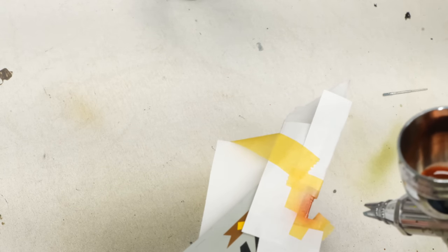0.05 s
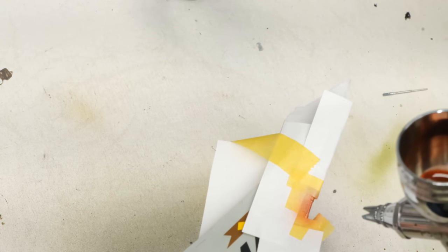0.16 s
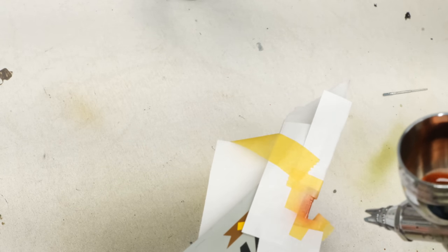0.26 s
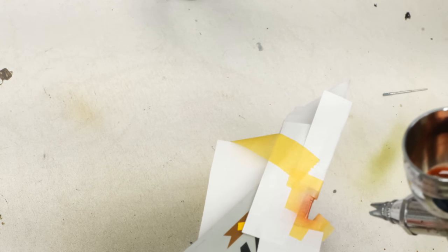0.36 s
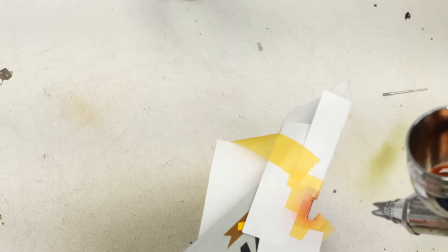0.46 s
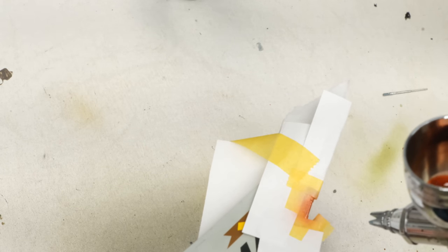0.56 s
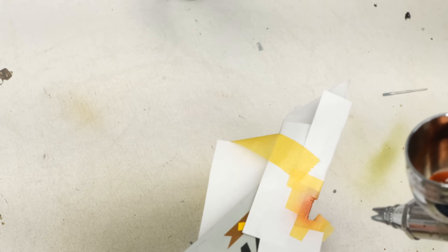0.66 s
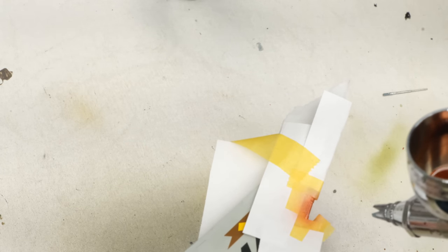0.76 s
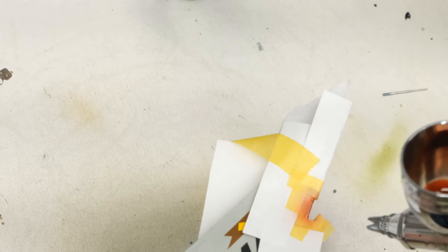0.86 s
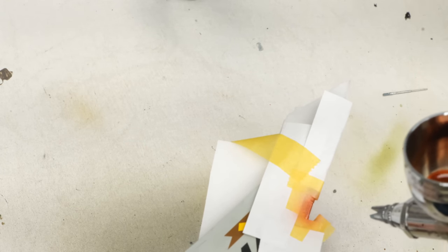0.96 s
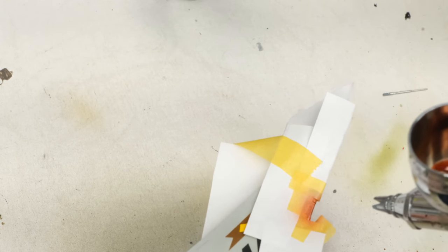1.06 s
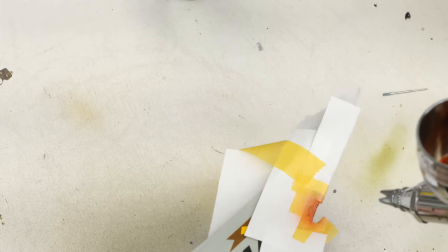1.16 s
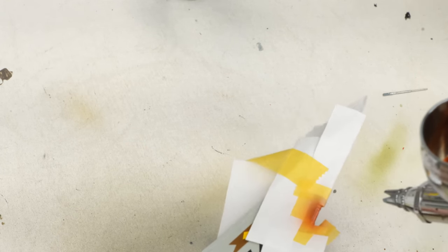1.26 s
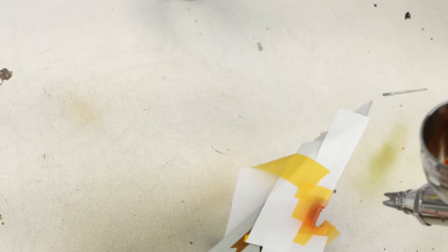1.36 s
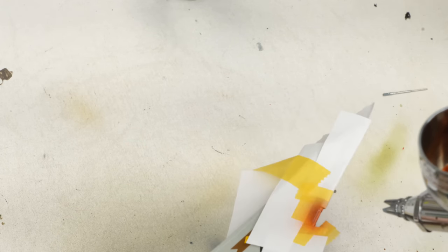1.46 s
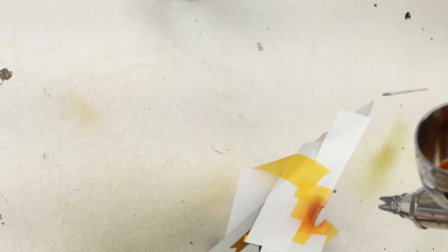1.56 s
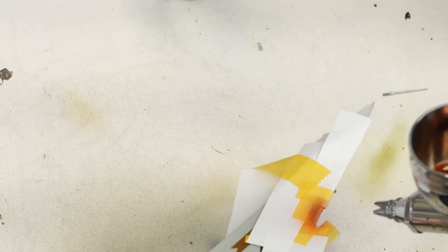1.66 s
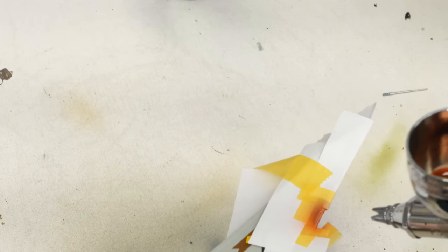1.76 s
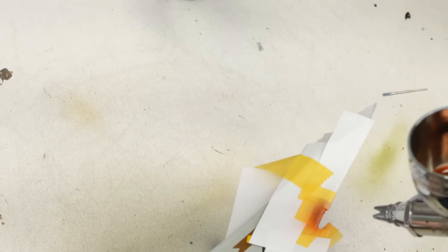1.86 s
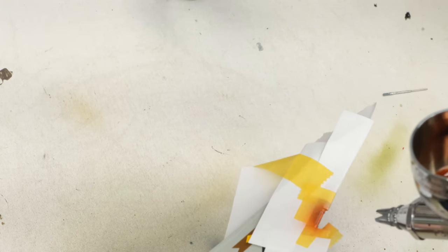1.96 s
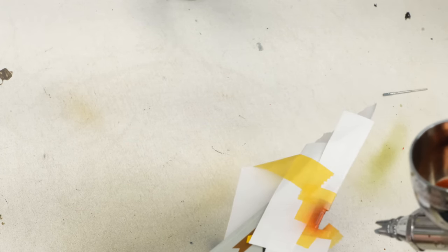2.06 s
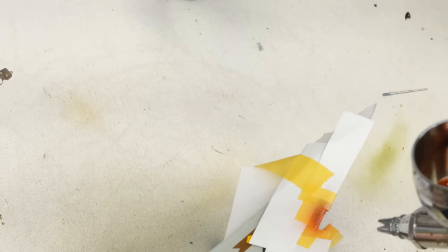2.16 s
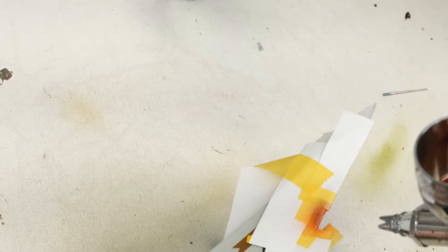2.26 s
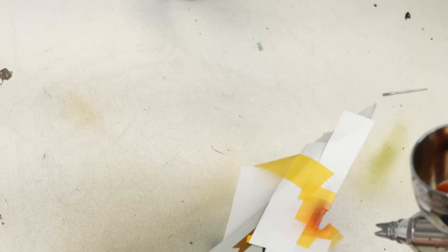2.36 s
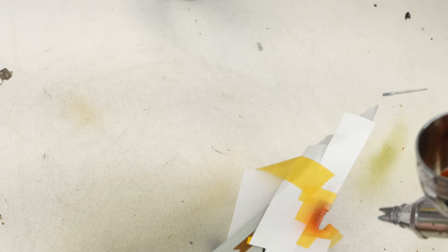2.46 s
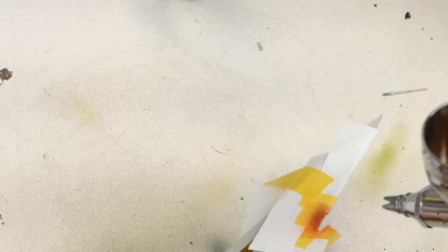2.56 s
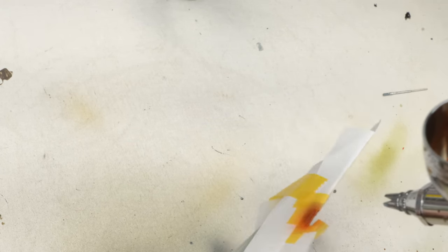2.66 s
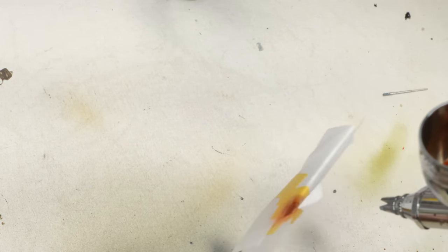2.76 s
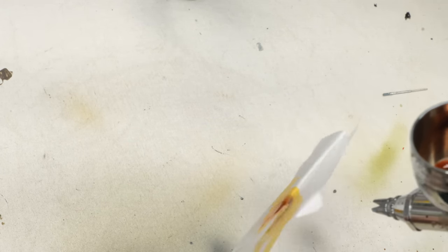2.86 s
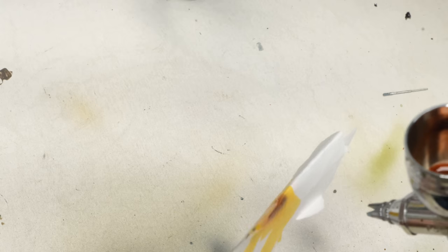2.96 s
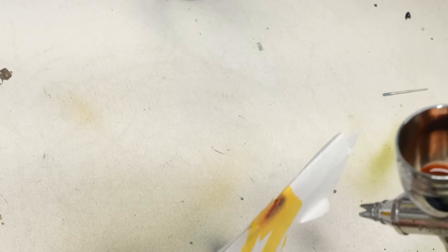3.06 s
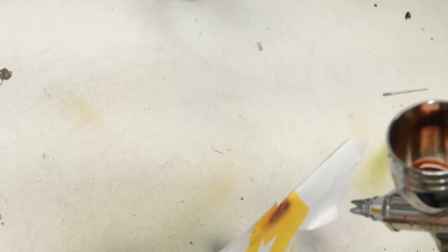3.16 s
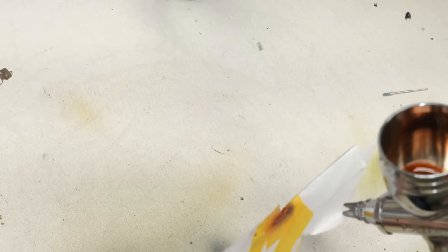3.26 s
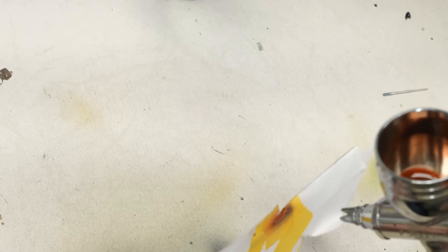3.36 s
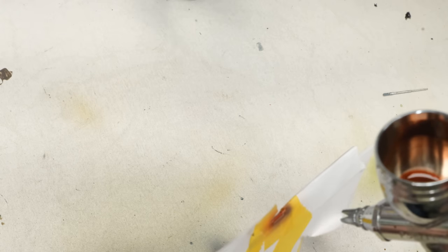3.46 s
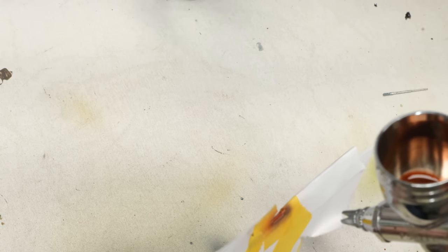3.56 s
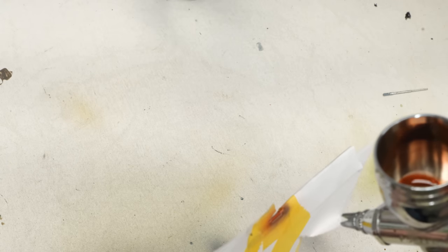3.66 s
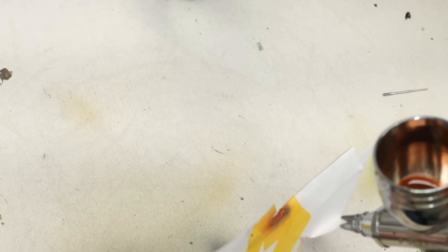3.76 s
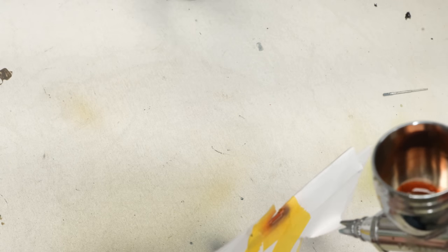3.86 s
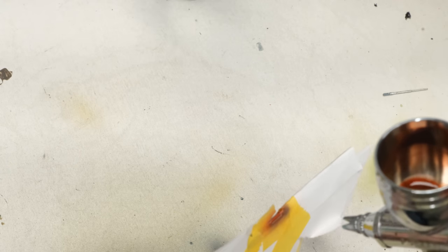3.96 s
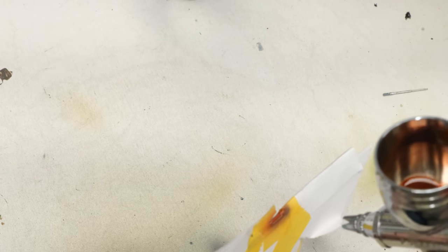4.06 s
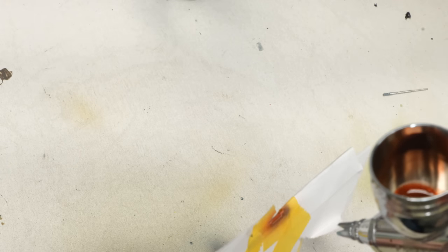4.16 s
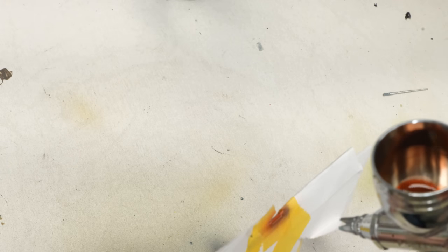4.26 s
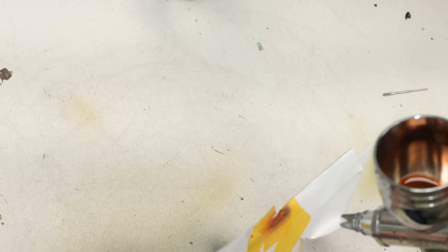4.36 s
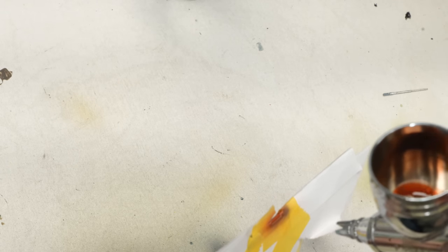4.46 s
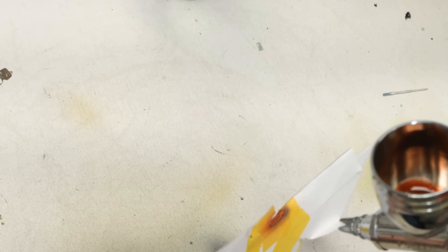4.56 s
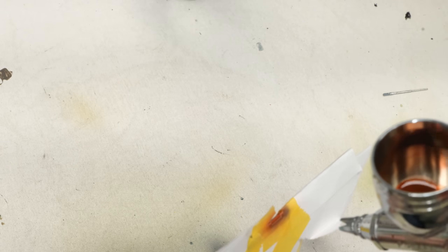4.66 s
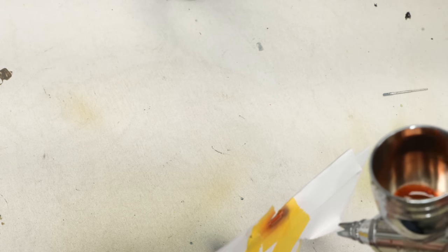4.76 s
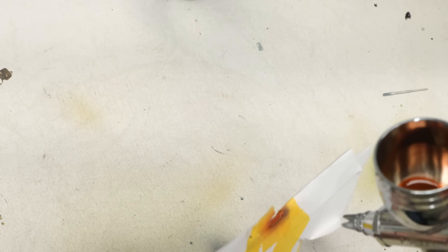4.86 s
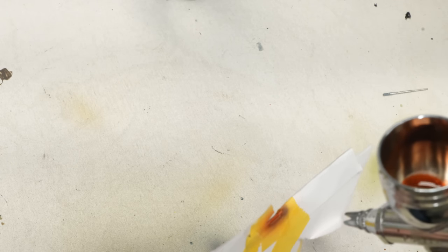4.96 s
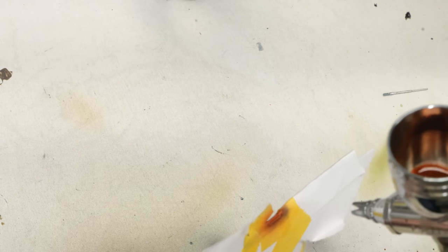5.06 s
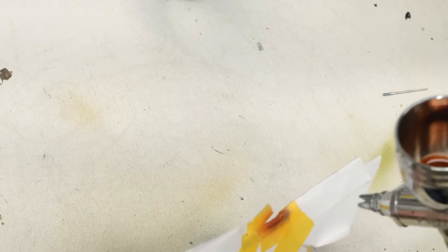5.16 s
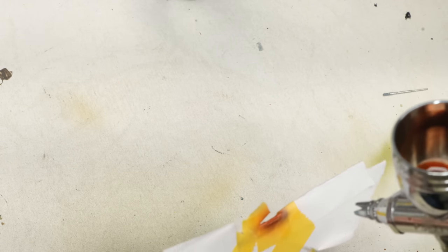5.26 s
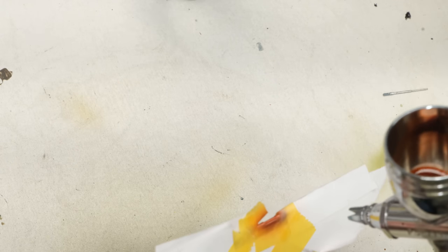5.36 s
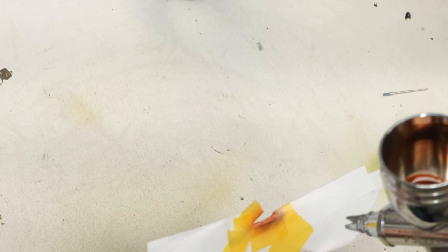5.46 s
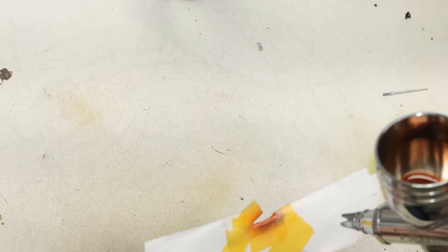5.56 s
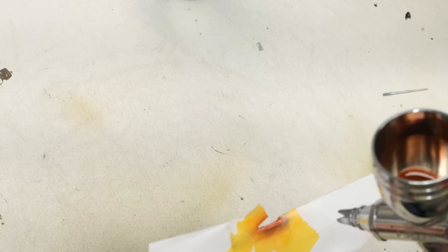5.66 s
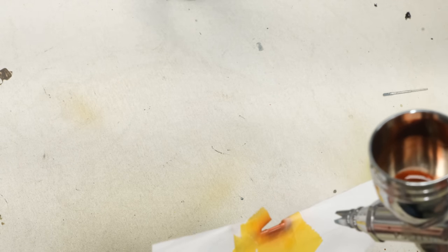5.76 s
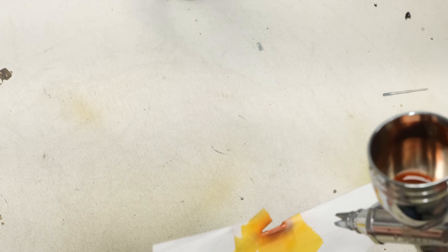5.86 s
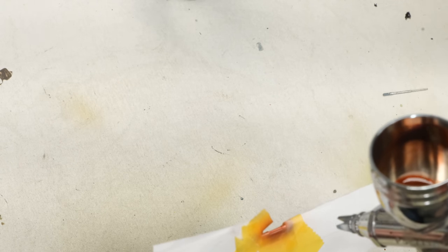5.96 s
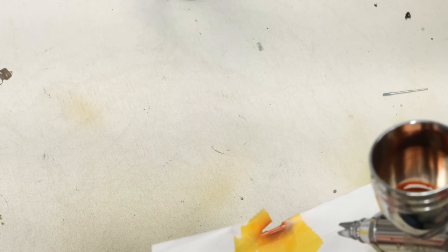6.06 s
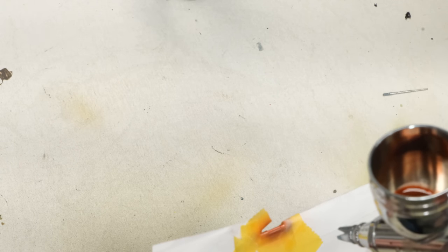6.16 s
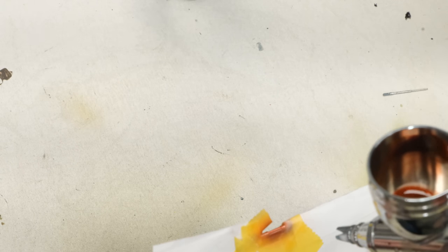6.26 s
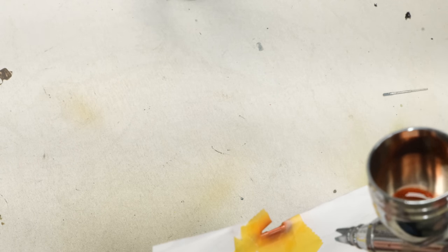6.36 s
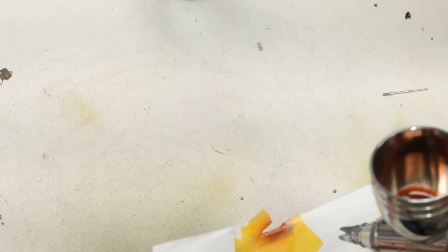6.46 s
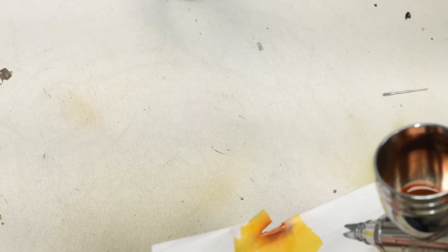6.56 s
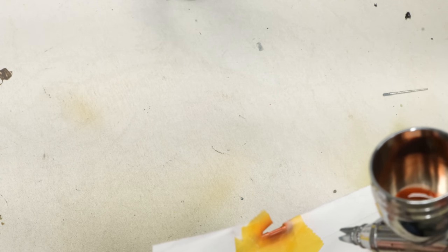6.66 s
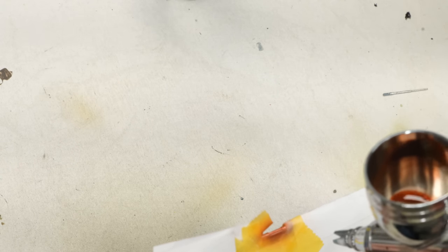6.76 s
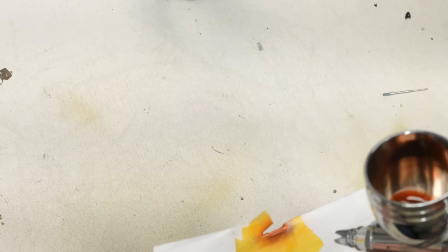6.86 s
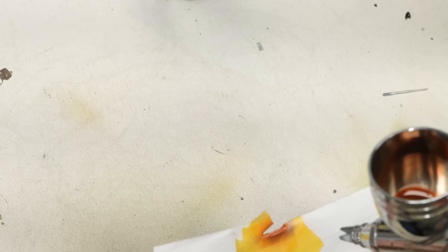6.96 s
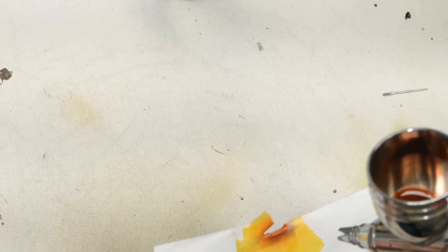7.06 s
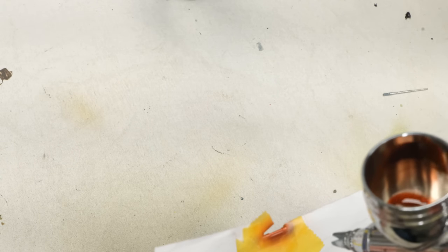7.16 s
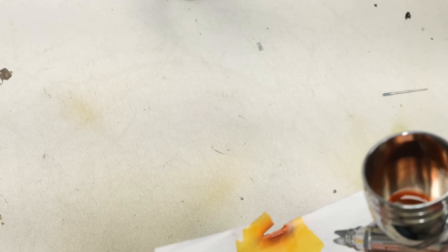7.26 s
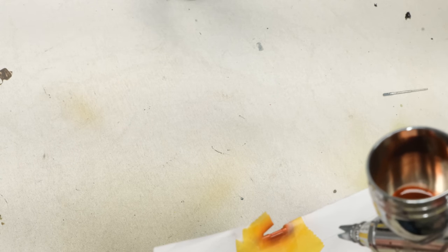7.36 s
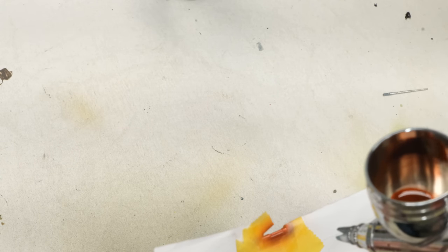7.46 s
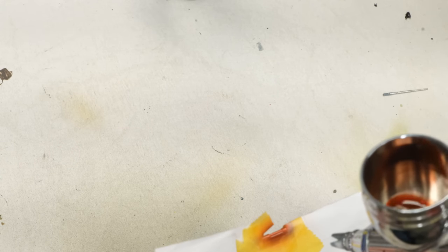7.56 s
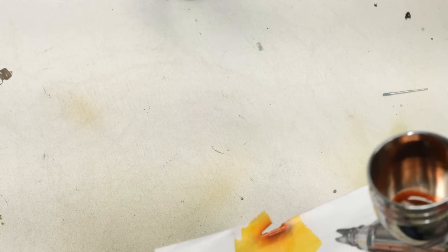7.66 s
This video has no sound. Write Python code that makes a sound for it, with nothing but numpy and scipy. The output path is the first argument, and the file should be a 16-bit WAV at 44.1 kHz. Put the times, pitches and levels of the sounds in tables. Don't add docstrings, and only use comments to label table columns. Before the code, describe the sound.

An airbrush hisses in seven separate bursts of differing length and tone, with small metallic trigger ticks, over a faint workshop fan rumble and hum.

```python
import sys
import numpy as np
from scipy import signal
from scipy.fft import rfft, irfft, next_fast_len
from scipy.io import wavfile
from scipy.ndimage import uniform_filter1d

SR = 44100
rng = np.random.default_rng(int(sys.argv[2]) if len(sys.argv) > 2 else 0)


def magnitude_from_level(level_db):
    exponent = np.asarray(level_db, float) / 20
    return 10 ** exponent


def store_pcm(level_fs):
    pcm = np.round(np.clip(level_fs, -1, 1) * 32767).astype(np.int16)
    wavfile.write(sys.argv[1], SR, np.atleast_2d(pcm).T)


N = 339570

# centre_hz, width_hz, gain_db
WALLS = [(780, 130, 3.3), (840, 80, 3.8), (1010, 100, 3.5), (1420, 80, 2.3), (1770, 280, -4.2),
         (2470, 120, -5.2), (2750, 130, -2.8), (3170, 100, -2.1), (3680, 140, 3.5), (4000, 170, 3.9),
         (4420, 170, 2.2), (5020, 210, -1.9)]


def evened(x):
    return x / np.sqrt(np.mean(x ** 2) + 1e-20)


def read(points, hz):
    point_hz, value = np.transpose(points)
    return np.interp(np.log(hz + 1), np.log(point_hz + 1), value)


def bumps_db(table, hz):
    return sum(db * np.exp(-np.log(16) * ((hz - centre_hz) / width_hz) ** 2)
               for centre_hz, width_hz, db in table)


def add(mix, start_s, sound):
    part = mix[round(start_s * SR):][:len(sound)]
    part += sound[:len(part)]


def noise(gain, size):
    n = next_fast_len(size)
    spectrum = rfft(rng.standard_normal(n)) * gain(np.fft.rfftfreq(n, 1 / SR))
    return evened(irfft(spectrum, n)[:size])


def drift(rate_hz, size):
    return noise(lambda hz: (hz > 0) / (1 + (hz / rate_hz) ** 2), size)


def self_noise(dry):
    # freq_hz, density_db
    self_spectrum = [(30, -7), (300, -10), (1000, -14), (4000, -15), (12000, -16), (15500, -18.5)]
    loud_db = 10 * np.log10(uniform_filter1d(dry[0] ** 2, size=2000) + 1e-12)
    level_db = -74.5 - 0.18 * np.maximum(loud_db + 56.5, 0)
    return magnitude_from_level(level_db) * noise(lambda hz: magnitude_from_level(read(self_spectrum, hz)), N)


def slips():
    # centre_s, low_hz, high_hz, level_db
    slip_rows = [(.753, 7600, 9200, -59), (.917, 4700, 7000, -45), (1.055, 12500, 13800, -64),
                 (2.031, 5700, 7000, -44), (4.239, 7600, 9600, -63), (4.354, 5200, 8300, -55),
                 (4.609, 4200, 5200, -52), (6.14, 8300, 9600, -66), (6.21, 5700, 6900, -56),
                 (6.978, 5200, 6300, -50), (7.395, 5700, 6900, -55), (7.417, 6900, 8300, -56)]
    out = np.zeros(N)
    size = 2048
    window = np.sin(np.pi * np.arange(size) / size) ** 2
    for centre_s, low_hz, high_hz, db in slip_rows:
        puff = noise(lambda hz: (hz > low_hz) & (hz < high_hz), size) * window
        add(out, centre_s - size / 2 / SR, magnitude_from_level(db) * puff)
    return out


def fan():
    # freq_hz, density_db
    rumble = [(10, -22), (30, -7.5), (80, -3), (115, -0.5), (160, -3.5), (350, -2.5), (750, -11),
              (2500, -45)]
    # centre_hz, width_hz, gain_db over the rumble
    housing = [(175, 5.1, 9.5), (192, 6, 7.5), (223.2, 8.9, 10.5), (242.3, 7, 11), (290.8, 5, 12),
               (317.3, 8.6, 7), (338.2, 7.8, 9.5), (360, 13.6, 7.5), (410.4, 2.8, 12.5), (424, 2.2, 10),
               (465, 7.7, 8), (525, 11.5, 10), (580, 9, 10.5), (616, 13, 9)]
    level_db = -58.5 + 0.72 * drift(5.0, N)
    return magnitude_from_level(level_db) * noise(lambda hz: magnitude_from_level(read(rumble, hz) + bumps_db(housing + WALLS, hz)), N)


def patchy(x, depth_db):
    hz, _, z = signal.stft(x, SR, nperseg=512)
    chance = uniform_filter1d(rng.standard_normal(z.shape), size=9, axis=0)
    chance = evened(uniform_filter1d(chance, size=5, axis=1))
    treble = np.clip((hz[:, None] - 6500) / 3000, 0, 1)
    holes = np.clip(chance - 1.7, 0, 0.5) * 2 * treble
    return signal.istft(z * magnitude_from_level(-depth_db * holes), SR, nperseg=512)[1][:N]


def distant_hiss():
    # freq_hz, density_db
    hiss_spectrum = [(590, -34), (1000, -4), (1820, -6.5), (2910, -10.5), (6360, -18), (15600, -20.5)]
    level_db = -66.5 + 0.24 * drift(5.8, N)
    hiss = magnitude_from_level(level_db) * noise(lambda hz: magnitude_from_level(read(hiss_spectrum, hz) + bumps_db(WALLS, hz)), N)
    return patchy(hiss, depth_db=14)


def mains_hum():
    # freq_hz, rms_db
    hum_lines = [(60.0, -67.5), (119.9, -64), (203.9, -69)]
    t = np.arange(N) / SR
    hum = np.zeros(N)
    for hz, db in hum_lines:
        line = np.sin(2 * np.pi * (hz * t + rng.random()))
        hum += np.sqrt(2) * magnitude_from_level(db + 2.1 * drift(3.5, N)) * line
    return hum


def room(x):
    # freq_hz, t60_s
    decay = [(500, 0.22), (2000, .35), (5000, 0.29), (12000, 0.15)]
    late_db, late_stretch = -14.5, 3.1
    taps = np.zeros(SR // 2)
    at = np.arange(130, SR // 2 - 20, 20)
    taps[at + rng.integers(0, 20, len(at))] = rng.choice([-1., 1.], len(at))
    hz, t, z = signal.stft(taps, SR, nperseg=256)
    fall_db = -60 * t / read(decay, hz)[:, None]
    fall = magnitude_from_level(fall_db) + magnitude_from_level(late_db + fall_db / late_stretch)
    tail = signal.istft(z * fall, SR, nperseg=256)[1]
    return signal.fftconvolve(x, tail / np.linalg.norm(tail))[:N]


def tick(peak_s, db):
    # freq_hz, level_db, t60_s
    trigger_modes = [(2340, -6, 0.007), (3450, -2, 0.0086), (5000, -4.5, 0.0096), (5920, -3, .005),
                     (6800, -0.5, 0.0034), (8500, -8, .003)]
    t = np.arange(600) / SR
    ring = sum(magnitude_from_level(mode_db - 60 * t / t60_s) * np.sin(2 * np.pi * (hz * t + rng.random()))
               for hz, mode_db, t60_s in trigger_modes)
    snap = ring * np.clip(t / 0.00056, 0, 1) ** 2
    return peak_s - 0.0006, magnitude_from_level(db) * 0.14 * evened(snap)


def turbulence(at_s, end_s, jet_db, fizz_db, rush_db, shut_db):
    fizz_steady, rush_steady = 0.63, 0.46
    swing_max_db = 7
    valve_shut_s = 0.06
    hz = np.fft.rfftfreq(512, 1 / SR)
    real, imag, wander = rng.standard_normal((len(at_s), 257, 3)).T
    wander = uniform_filter1d(uniform_filter1d(wander, size=3, axis=0), size=90, axis=1)
    wander = evened(wander)
    swing_db = np.clip(np.median(jet_db) - jet_db, -swing_max_db, swing_max_db)
    shut = np.clip(1 - (end_s - at_s) / valve_shut_s, 0, 1)
    bass = np.clip((3200 - hz) / 1400, 0, 1)[:, None]
    treble = np.clip((hz - 4600) / 4000, 0, 1)[:, None]
    fizz = treble * (fizz_db + fizz_steady * swing_db)
    rush = bass * (rush_db + rush_steady * swing_db + shut_db * shut)
    gain_db = (0.8 + 0.7 * treble) * wander + fizz + rush
    return signal.istft((real + 1j * imag) * magnitude_from_level(gain_db), nperseg=512, noverlap=384)[1]


def hollows_db(pose, hoot_db, hz):
    # freq_hz, density_db
    jet_facing = [(450.0, -26), (700.0, -16.5), (1000.0, -8), (1800.0, -0.3), (3500.0, -2), (6000.0, -10.5),
                  (9000.0, -17.5), (15600.0, -32.5)]
    jet_tilted = [(450.0, -22.5), (700.0, -8.5), (1000.0, -0.8), (1800.0, -2.1), (3500.0, -7),
                  (6000.0, -12.5), (9000.0, -21.5), (15600.0, -31)]
    jet_flat = [(450.0, -28), (700.0, -13), (1000.0, -1.2), (1800.0, -4.5), (3500.0, -8.5), (6000.0, -11),
                (9000.0, -26), (15600.0, -34.1)]
    jet_edge = [(450, -8), (750, 2), (1100, -4.5), (1800, -3), (4500, -8), (6000, -6.5), (8000, -11.5),
                (15600, -16.5)]
    # centre_hz, width_hz, gain_db
    facing = [(1420.0, 160.0, -4.3), (2060.0, 280.0, -6.0), (2890.0, 60.0, -4.6), (2960.0, 900.0, -8.0),
              (3180.0, 140.0, 9.4), (3620.0, 120.0, -5.1), (4120.0, 160.0, -7.7), (4510.0, 360.0, 4.9),
              (5370.0, 390.0, 3.0), (6020.0, 90.0, -4.7), (7270.0, 900.0, -4.1), (9150.0, 440.0, -4.5),
              (10240.0, 890.0, -5.0), (15250.0, 260.0, 5.0)]
    tilted = [(700.0, 70.0, -12.0), (860.0, 100.0, -6.3), (1310.0, 130.0, -9.5), (1690.0, 390.0, -10.0),
              (2340.0, 450.0, -7.5), (2460.0, 150.0, 9.3), (4040.0, 100.0, 6.5), (4590.0, 420.0, -5.7),
              (6040.0, 380.0, 5.5), (6290.0, 460.0, -5.1), (7090.0, 270.0, 5.4), (7830.0, 200.0, -6.8),
              (8950.0, 630.0, -4.1), (9500.0, 230.0, -5.8)]
    flat = [(710.0, 60.0, -8.8), (870.0, 80.0, -6.1), (1330.0, 170.0, -4.0), (1560.0, 120.0, -6.9),
            (1790.0, 170.0, -6.5), (2430.0, 110.0, 3.7), (2580.0, 50.0, -4.7), (3260.0, 570.0, -12.0),
            (3310.0, 80.0, 5.6), (3780.0, 110.0, -5.1), (4050.0, 90.0, 3.5), (6470.0, 790.0, -6.4),
            (7590.0, 270.0, 3.9), (10630.0, 680.0, 3.1)]
    edge_on = [(640, 120, -3.0), (1050, 310, 6.6), (2180, 260, -4.1), (3960, 230, 3.5), (7630, 610, -4.2)]
    # centre_hz, width_hz, gain_db
    bench = [(1236, 29, -3.5), (2194, 53, -1.5), (2900, 37, 4), (3560, 66, 4), (4230, 110, 3.4),
             (5300, 160, -1.2), (5990, 240, 1.4), (6240, 60, -3), (10260, 590, 1.), (11300, 250, 1)]
    poses = [(jet_facing, facing), (jet_tilted, tilted), (jet_flat, flat), (jet_edge, edge_on)]
    broad, hollows = poses[int(pose)]
    colour_db = read(broad, hz) + 0.99 * bumps_db(hollows + bench, hz)
    colour_db = colour_db + bumps_db([(730, 200, hoot_db)], hz)
    ripple = evened(uniform_filter1d(rng.standard_normal(400), size=3))
    ripple_db = 1.1 * np.interp(hz, np.linspace(4400, SR / 2, 400), ripple, left=0)
    return colour_db + ripple_db


def burst(rows, pose, fizz_db, rush_db, hoot_db, shut_db):
    s, jet_db = np.transpose(rows)
    t = np.arange(s[0], s[-1], 1 / SR)
    at_s = s[0] + np.arange(len(t) // 128 + 5) * 128 / SR
    air = turbulence(at_s, s[-1], np.interp(at_s, s, jet_db), fizz_db, rush_db, shut_db)
    hz = np.fft.rfftfreq(len(air), 1 / SR)
    colour_db = hollows_db(pose, hoot_db, hz)
    blurred_db = uniform_filter1d(colour_db, size=len(hz) // 30)
    jet = irfft(rfft(air) * magnitude_from_level([colour_db, blurred_db]) * (hz > 380), len(air))
    flutter_db = 0.34 * drift(16, len(t)) + 0.5 * drift(500, len(t))
    opening = np.clip((t - s[0] + 0.0051) / 0.017, 0, 1) ** 1.04
    closing = np.clip((s[-1] - t + 0.0062) / 0.0062, 0, 1)
    level = magnitude_from_level(np.interp(t, s, jet_db) + flutter_db) * opening * closing
    return s[0], level * evened(jet[:, :len(t)])


def scene():
    # time_s, level_db
    bursts = [
        [(0.204, -45), (0.218, -39), (0.256, -34), (0.944, -36), (0.96, -33.5), (1.062, -35.5), (1.11, -44),
         (1.125, -58)],
        [(1.43, -56), (1.438, -39.5), (1.46, -37), (1.63, -45), (1.645, -58)],
        [(1.908, -52), (1.918, -41), (1.932, -33.5), (2.186, -34), (2.262, -34.5), (2.34, -35.5),
         (2.466, -36.5), (2.514, -45), (2.528, -59)],
        [(2.972, -48), (2.982, -45), (2.994, -51), (3.06, -58), (3.172, -50), (3.19, -66)],
        [(3.628, -50), (3.646, -42), (3.822, -39.5), (4.05, -44.5), (4.33, -40.5), (5.02, -42.5), (5.04, -46.5),
         (5.055, -58)],
        [(5.445, -51), (5.457, -42), (5.495, -48), (5.607, -46.5), (5.647, -40.5), (5.668, -62)],
        [(6.087, -50), (6.103, -40), (6.48, -39), (6.676, -44.5), (6.693, -40.5), (7.37, -38.5), (7.41, -41),
         (7.563, -37.5), (7.7, -40.5)],
    ]
    # pose (0 facing, 1 tilted, 2 flat, 3 edge-on), nozzle fizz_db, low rush_db,
    # air-cap hoot_db, rush left as the valve shuts shut_db
    aims = [
        (0, 0, 2, 0., 1.),
        (0, 1.5, 3.5, 7., 1.),
        (0, 0.5, -1.5, -0.5, 6.5),
        (3, 0., 0., 0., 1.),
        (1, 0.5, 1, 1, 1.),
        (2, 4, -0.5, 6, -1.),
        (2, 0., 0.5, -0.5, 0.),
    ]
    # peak_s, peak_db
    ticks = [
        (2.9815, -28),
        (2.9864, -42),
        (5.459, -32),
    ]
    near, far = np.zeros((2, N))
    for rows, aim in zip(bursts, aims):
        start_s, (direct, spread) = burst(rows, *aim)
        add(near, start_s, direct)
        add(far, start_s, spread)
    for row in ticks:
        start_s, snap = tick(*row)
        add(near, start_s, snap)
        add(far, start_s, snap)
    workshop = fan() + distant_hiss() + mains_hum()
    mid = near + magnitude_from_level(-15.5) * room(far) + workshop
    return np.array([mid, mid])


def low_pass(x):
    return signal.sosfilt(signal.butter(12, 15740, fs=SR, output="sos"), x)


def record(dry):
    side = self_noise(dry) + slips()
    edge = signal.firwin(401, 15760, window=("kaiser", 9), fs=SR)[None]
    mix = signal.oaconvolve(dry + np.array([side, -side]), edge, "same")
    return low_pass(mix)


dry = scene()
out = record(dry)
store_pcm(out)
```